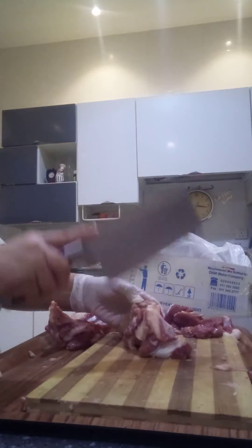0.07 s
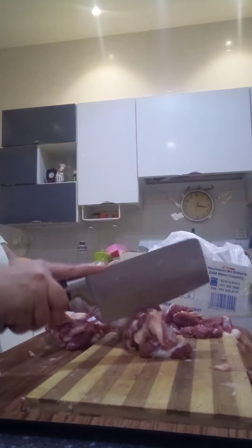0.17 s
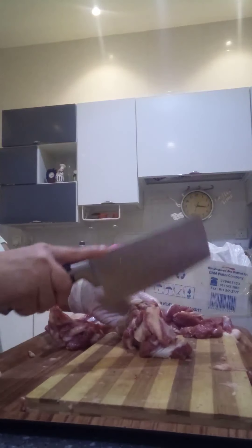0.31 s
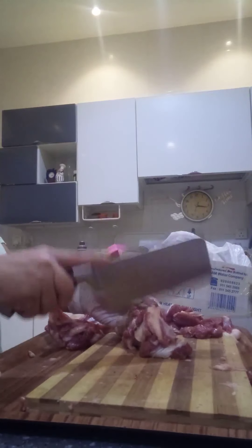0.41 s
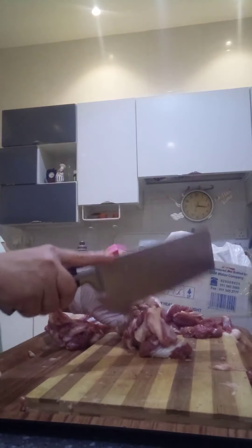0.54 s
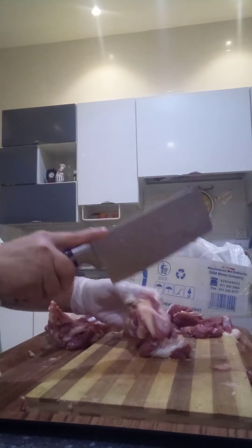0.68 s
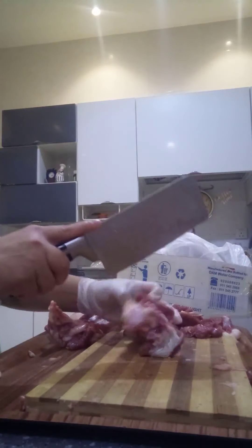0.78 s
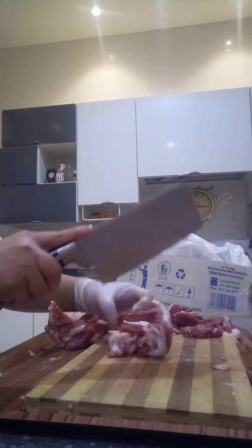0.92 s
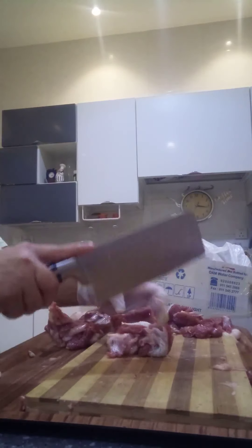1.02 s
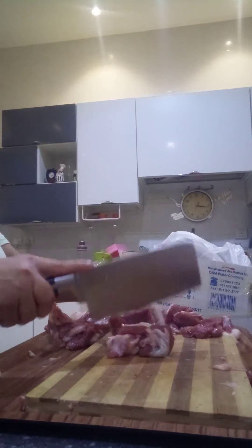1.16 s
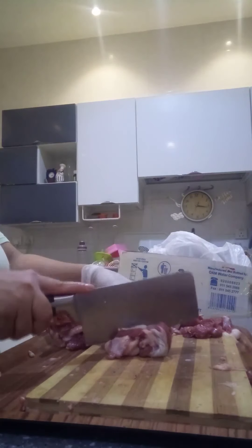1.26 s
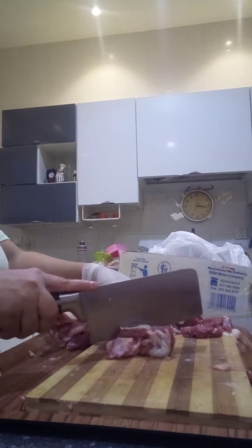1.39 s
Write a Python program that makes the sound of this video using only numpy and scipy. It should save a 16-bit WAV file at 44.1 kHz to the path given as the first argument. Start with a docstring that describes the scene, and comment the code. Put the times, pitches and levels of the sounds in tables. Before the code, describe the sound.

A heavy cleaver chops through meat and bone into a thick wooden board at about 0.2 seconds: a loud woody knock with a sharp crack, low counter thump and short steel chatter until 0.3. At 0.5 the meat slaps down with a softer, dull thud. Very faint wet ticks follow around 0.8 to 1.0. Short bright kitchen reverberation; low extractor fan air and hum run throughout, through a phone microphone.

```python
"""A hard-walled kitchen: a heavy cleaver cuts through meat and bone into a thick wooden board.
A moment later the meat is slapped down on the board with a dull thud.
Pushes of force ring the modes of board and counter, light touches ring the steel blade, and bursts
of snaps make fibre, bone and wet slap; shaped noise is the room's tail and the extractor fan's air.
A motor hum and the drone of the duct fill the room; a phone microphone picks it all up."""
import sys
import numpy as np
from scipy import signal
from scipy.fft import rfft, irfft
from scipy.io import wavfile

SR = 44100
rng = np.random.default_rng(int(sys.argv[2]) if len(sys.argv) > 2 else 0)


def wav_record(signal):
    """Record a signal, one row per channel, as 16-bit PCM in the file named by sys.argv[1]."""
    frames = np.transpose(np.atleast_2d(signal))
    bounded = np.clip(frames, -1, 1)
    # unit amplitude maps onto the largest positive 16-bit level
    quanta = np.round(bounded * 32767).astype(np.int16)
    wavfile.write(sys.argv[1], SR, quanta)


def gain_from_db(level_db):
    """Convert decibel levels to linear amplitude factors (20 dB per decade)."""
    decades = np.asarray(level_db, float) / 20
    return 10 ** decades


N = 63945  # samples

# spectrum of the fan's air, relative: pitch_hz, level_db (per Hz)
FAN_SPECTRUM = [(24, -43.5), (40, -16), (65, -14), (86, -35), (106, -13.5), (161, -10.5), (204, 1.5),
                (238, -11), (271, -7.5), (359, -7.5), (392, -9), (519, -6), (579, -10), (838, -12.5),
                (975, -18.5), (1270, -18.5), (1540, -26.5), (6460, -32.5), (7200, -40), (9360, -46),
                (15800, -120)]
# overall level of the fan's air: time_s, level_db
FAN_LEVEL = [(0, -49), (.45, -47), (.8, -46.5), (1.1, -46), (1.45, -46.5)]
# tones of the motor hum, relative: pitch_hz, level_db
HUM_TONES = [(59, -12), (85, -19), (119.5, -1)]
# the hum comes and goes: time_s, level_db
HUM_LEVEL = [(0, -54), (.1, -60.5), (.18, -58.5), (.37, -62), (.5, -58.5), (.66, -62), (.75, -59.5),
             (.95, -57), (1.05, -63.5), (1.28, -68), (1.35, -51.5), (1.45, -67.5)]
# tearing fibre, splitting bone and wet slap: start_s, length_s, level_db, dull_above_hz
CRACKS = [(0.2057, .005, -32.5, 8040), (0.2123, .0042, -17.5, 9000), (0.215, 0.0056, -29, 5000),
          (0.5025, 0.0062, -39.5, 6000), (0.5088, 0.0064, -34, 5000)]
# small wet ticks of the gloved hand on the meat: start_s, level_db
TICKS = [(.798, -60), (.9265, -57), (.982, -57)]
# colour of cracks and ticks: pitch_hz, level_db
CRACK_COLOUR = [(500, -1), (1200, 4), (2000, 2.5), (3000, -3.5), (4500, -1.5), (6800, -3), (9000, -3),
                (15000, 20)]
# modes of the board and the counter under it: pitch_hz, blade_level_db, meat_level_db, t60_s
BOARD_MODES = [(172, -53, -23.5, 0.021), (248, -28.5, -33.5, 0.24), (263.4, -14.5, -10, 0.088),
               (361.7, -12.5, -16, 0.093), (433, -14.5, -30, 0.04), (469, -12, -11, 0.048),
               (685, -6, -19.5, 0.034), (770, -14, -9.5, 0.028), (1034, -25, -19, 0.027),
               (1330, -24.5, -8.5, 0.013), (1490, -18.5, -44, 0.055), (1850, -26.5, -22, 0.018),
               (2096, -26, -15.5, 0.038)]
# pushes of the blade on the middle of the board: start_s, force_db, contact_s
BLADE_PUSHES = [(.2064, -24.5, .0007), (.2106, -18.5, 0.00094), (.2143, -14, 0.00053),
                (.2159, -8.5, 0.0012), (.2237, -14.5, 0.00064), (.2322, -22, 0.0019), (.2372, -19, 0.0013)]
# pushes of the dropped meat, nearer the edge: start_s, force_db, contact_s
MEAT_PUSHES = [(.5014, -24, .0006), (.5031, -16.5, 0.00071), (.5094, -17, 0.00093), (.5116, -19.5, 0.00054),
               (0.516, -15.5, 0.003), (0.5183, -10.5, 0.0027), (0.5263, -20, 0.0023),
               (.5500, -26.5, 0.0034), (.5790, -31.5, 0.0026)]
# the counter takes the weight of each blow: start_s, force_db
COUNTER_THUMPS = [(0.207, -19.5), (0.501, -26)]
# decay of the kitchen's reverberation: pitch_hz, t60_s
ROOM_T60 = [(60, 1), (250, 0.18), (700, 0.59), (2000, 0.69), (5000, 0.66), (9000, 0.29)]
# strength of the kitchen's reverberation: pitch_hz, level_db
ROOM_GAIN = [(60, -58.5), (250, -42), (700, -42.5), (2000, -36.5), (5000, -33), (9000, -44)]
# modes of the steel blade, relative: pitch_hz, level_db, t60_s
BLADE_MODES = [(443, -4.5, .04), (603, 4, 0.058), (805, 0.5, 0.047), (1330, -7.5, 0.088),
               (1616, -9.5, 0.057)]
# response of the microphone path: pitch_hz, level_db
MIC_RESPONSE = [(4000, 0), (4900, -4), (6500, 2.5), (7100, -1.5), (7800, -13.5), (8800, -22), (10500, -38),
                (13000, -54), (14300, -55), (15200, -50)]


def rms_one(x):
    """Scale to rms 1."""
    return x / np.sqrt(np.mean(x ** 2) + 1e-20)


def at_hz(points, hz):
    """Read a (pitch_hz, value) table on a log frequency axis."""
    table_hz, values = np.transpose(points)
    return np.interp(np.log(np.maximum(hz, 1)), np.log(table_hz), values)


def drift(rate_hz):
    """Slow random wander, spread 1: noise through two equal low-pass poles, every 40th sample."""
    pole = np.exp(-80 * np.pi * rate_hz / SR)
    noise = rng.standard_normal(N // 40 + 4002)
    slow = signal.lfilter([1], [1, -2 * pole, pole * pole], noise)[4000:]  # skip the start-up
    return np.interp(np.arange(N) / 40, np.arange(len(slow)), rms_one(slow - slow.mean()))


def bands(count):
    """Overlapping log-spaced bands whose powers sum to one: centres and weights on the FFT grid."""
    hz = np.fft.rfftfreq(N, 1 / SR)
    centres = np.geomspace(25, 16000, count)
    place = np.interp(np.log(hz + 1), np.log(centres), np.arange(count))
    distance = abs(place - np.arange(count)[:, None])
    return centres, np.cos(np.pi / 2 * np.clip(distance, 0, 1))


def coloured(x, db):
    """Minimum-phase colouring by dB values on the FFT grid, through the folded cepstrum."""
    cepstrum = irfft(db * np.log(10) / 20, N)
    cepstrum[1:N // 2 + 1] *= 2
    cepstrum[N // 2 + 1:] = 0
    return irfft(rfft(x) * np.exp(rfft(cepstrum)), N)


def ring(x, hz, t60):
    """A decaying mode: a two-pole resonator that falls 60 dB in t60 seconds."""
    r, w = gain_from_db(-60 / (t60 * SR)), 2 * np.pi * hz / SR
    return signal.lfilter([0, np.sin(w)], [1, -2 * r * np.cos(w), r * r], x + 1e-18)


def fan_air(hum_db):
    """Shaped noise: the bands swell together and flicker apart, the lowest also follow the hum."""
    swell_db, flicker_db, rumble_below_hz = 1, 0.5, 130
    t, air, swell = np.arange(N) / SR, 0, drift(1.5)
    spectrum = gain_from_db(at_hz(FAN_SPECTRUM, np.fft.rfftfreq(N, 1 / SR)))
    noise = rfft(rng.standard_normal(N)) * spectrum
    for hz, weight in zip(*bands(count=20)):
        rumble_db = (hum_db - hum_db.mean()) * (hz < rumble_below_hz)
        band_db = swell_db * swell + flicker_db * drift(13.0) + rumble_db
        air = air + irfft(noise * weight, N) * gain_from_db(band_db)
    return gain_from_db(np.interp(t, *np.transpose(FAN_LEVEL))) * rms_one(air)


def duct_drone():
    """Noise through one narrow resonance of the duct."""
    duct_hz, width_hz, level_db = 203, 16, -57
    t60 = np.log(1000) / np.pi / width_hz
    return gain_from_db(level_db) * rms_one(ring(rng.standard_normal(N), duct_hz, t60))


def motor_hum(hum_db):
    """Steady low sines, each wavering in level, which come and go together."""
    waver_db = 1.5
    t, hum = np.arange(N) / SR, 0
    for hz, db in HUM_TONES:
        level = gain_from_db(db + waver_db * drift(2.2))
        tone = np.sqrt(2) * np.sin(2 * np.pi * (hz * t + rng.random()))
        hum = hum + level * tone
    return hum * gain_from_db(hum_db)


def fan():
    """The extractor fan: air noise, duct drone and motor hum."""
    hum_db = np.interp(np.arange(N) / SR, *np.transpose(HUM_LEVEL))
    return fan_air(hum_db) + duct_drone() + motor_hum(hum_db)


def cracks():
    """Dense uneven snaps under a short hold and fade; ticks are short ones.
    Row two is each burst's energy as one click, which the many walls smear into a smooth tail."""
    snaps_per_s, snap_spread_db, rise_s, fade_s = 12000, 2.0, .0005, .0012
    t, out = np.arange(N) / SR, np.zeros((2, N))
    struck = rng.random(N) < snaps_per_s / SR
    sizes = gain_from_db(snap_spread_db * rng.exponential(1, N))
    snaps = rms_one(struck * sizes * rng.choice([-1, 1], N))
    ticks = [(start, .001, db, 12000) for start, db in TICKS]
    for start, length, db, dull_hz in CRACKS + ticks:
        rise = np.clip((t - start) / rise_s, 0, 1)
        fade = np.exp(-np.clip(t - start - length, 0, 1) / fade_s)
        shape = gain_from_db(db) * rise * fade
        middle = int((start + length / 2) * SR)
        click = np.sqrt(np.sum(shape ** 2)) * (np.arange(N) == middle)
        out += signal.lfilter(*signal.butter(1, dull_hz, fs=SR), [shape * snaps, click])
    colour = at_hz(CRACK_COLOUR, np.fft.rfftfreq(N, 1 / SR))
    return [coloured(row, colour) for row in out]


def hump(start, db, length):
    """A smooth hump of force; its total push does not depend on its length."""
    phase = np.clip((np.arange(N) / SR - start) / length, 0, 1)
    return gain_from_db(db) * np.sin(np.pi * phase) ** 2 * 2 / (length * SR)


def board():
    """Each push sets all modes ringing, by where it lands; the counter thumps once a blow."""
    spot_spread_db = 1.5  # every push lands on a slightly different spot
    counter_hz, counter_t60_s, counter_push_s = 92, 0.085, 0.0044
    pushes = BLADE_PUSHES + MEAT_PUSHES
    humps = [hump(*push) for push in pushes]
    by_blade = np.arange(len(pushes)) < len(BLADE_PUSHES)
    spots = rng.standard_normal((len(pushes), len(BOARD_MODES)))
    weight = sum(hump(start, db, counter_push_s) for start, db in COUNTER_THUMPS)
    out = ring(weight, counter_hz, counter_t60_s)
    for k, (hz, blade_db, meat_db, t60) in enumerate(BOARD_MODES):
        push_db = np.where(by_blade, blade_db, meat_db) + spot_spread_db * spots[:, k]
        out = out + ring(gain_from_db(push_db) @ humps, hz, t60)
    return out


def kitchen(x):
    """Diffuse reverberation: after a gap, noise that builds up, then dies band by band."""
    gap_s, build_s = 0.0098, 0.003
    t, noise, tail = np.arange(N) / SR, rfft(rng.standard_normal(N)), 0
    for hz, weight in zip(*bands(count=14)):
        decay_db = at_hz(ROOM_GAIN, hz) - 60 * t / at_hz(ROOM_T60, hz)
        tail = tail + irfft(noise * weight, N) * gain_from_db(decay_db)
    build = np.clip((t - gap_s) / build_s, 0, 1)
    return signal.fftconvolve(x, tail * build)[:N]


def blade():
    """The steel chatters on the wood as it settles: quick uneven touches keep its modes going."""
    from_s, to_s, level_db, touches_per_s = .243, .288, -37, 600
    t = np.arange(N) / SR
    touches = (rng.random(N) < touches_per_s / SR) * rng.uniform(-1.2, 1, N)
    touches = touches * (t > from_s) * (t < to_s)
    touches = signal.lfilter([.3], [1, -.7], touches)  # softened contact
    return gain_from_db(level_db) * sum(gain_from_db(db) * ring(touches, hz, t60) for hz, db, t60 in BLADE_MODES)


def scene():
    """Board, blade and cracks, dry and in the room, over the fan."""
    body = board() + blade()
    crack, click = cracks()
    return (body + crack + kitchen(body + click) + fan())[None]


def roll_off(x):
    """The treble ends steeply here."""
    return signal.sosfilt(signal.butter(12, 15800, fs=SR, output="sos"), x)


def record(dry):
    """The phone microphone: treble rolls off steeply, the bass is cut, faint hiss is added."""
    bass_cut_hz, hiss_db = 60.7, -101
    x = coloured(dry[0], at_hz(MIC_RESPONSE, np.fft.rfftfreq(N, 1 / SR)))
    x = signal.sosfilt(signal.butter(4, bass_cut_hz, "high", fs=SR, output="sos"), x)
    x = x + gain_from_db(hiss_db) * rng.standard_normal(N)
    return roll_off(x[None])


dry = scene()
out = record(dry)
wav_record(out)
```